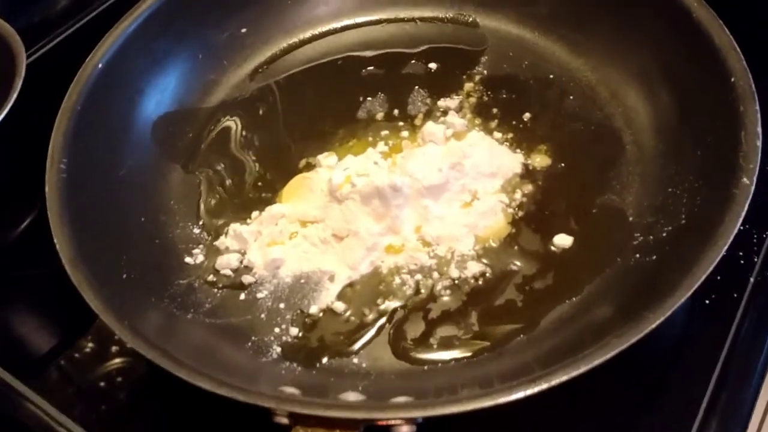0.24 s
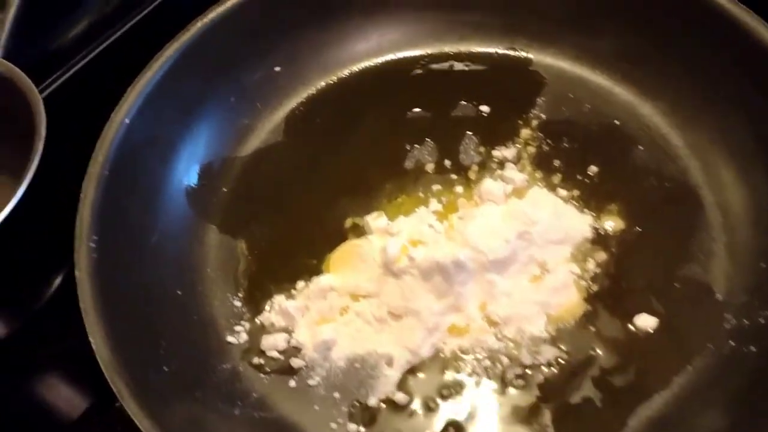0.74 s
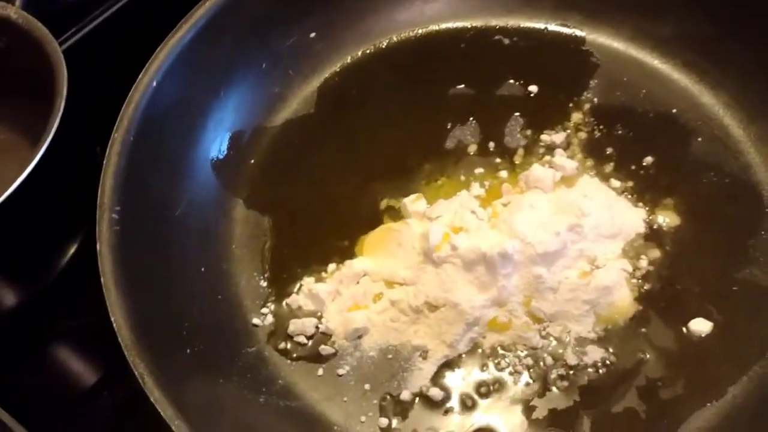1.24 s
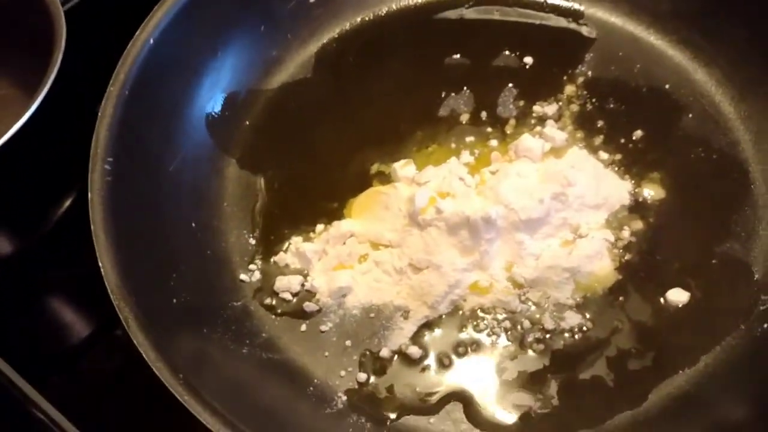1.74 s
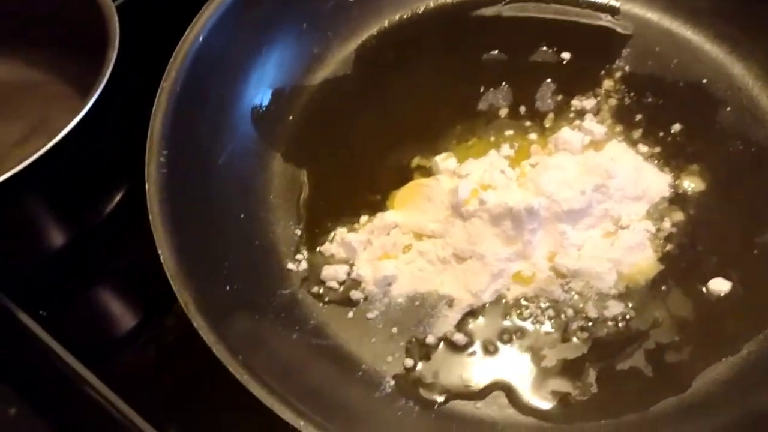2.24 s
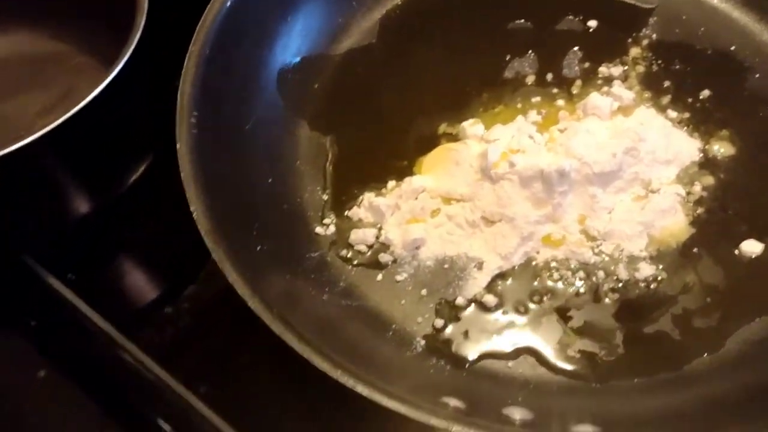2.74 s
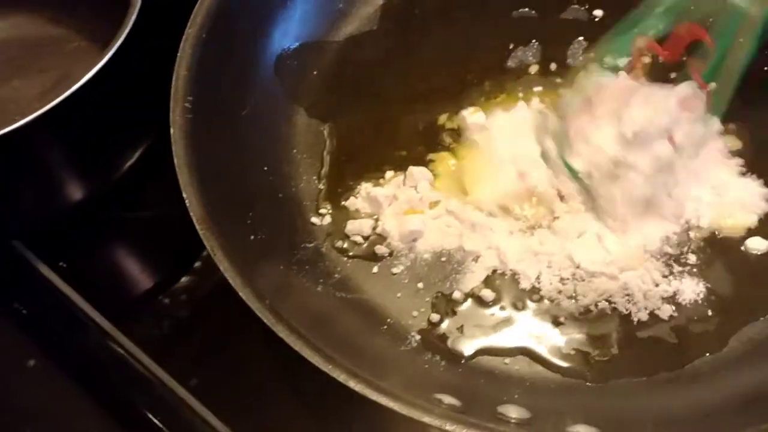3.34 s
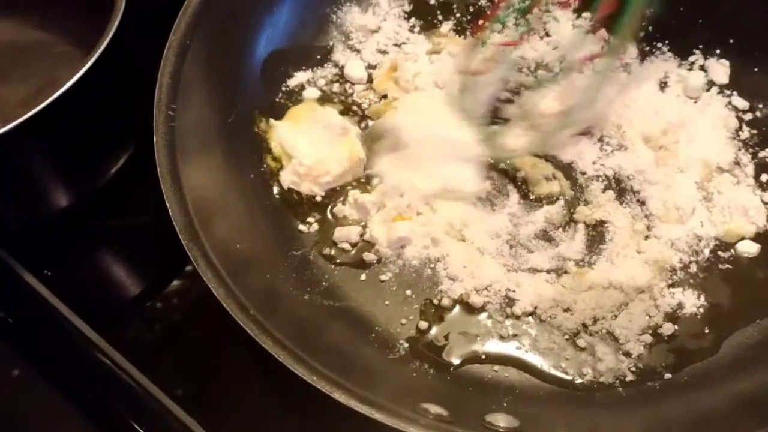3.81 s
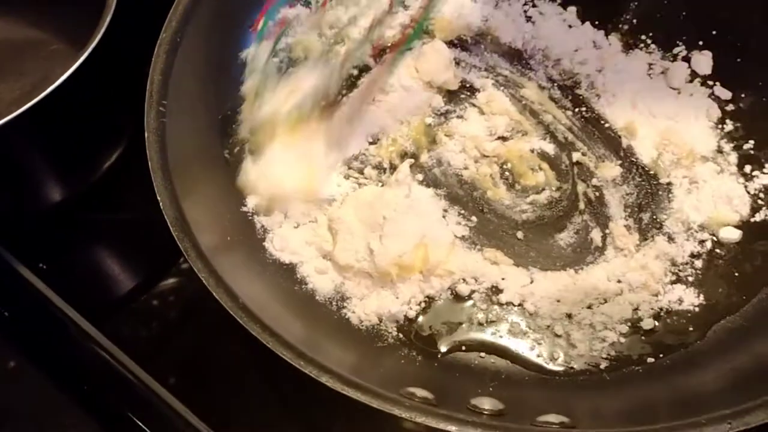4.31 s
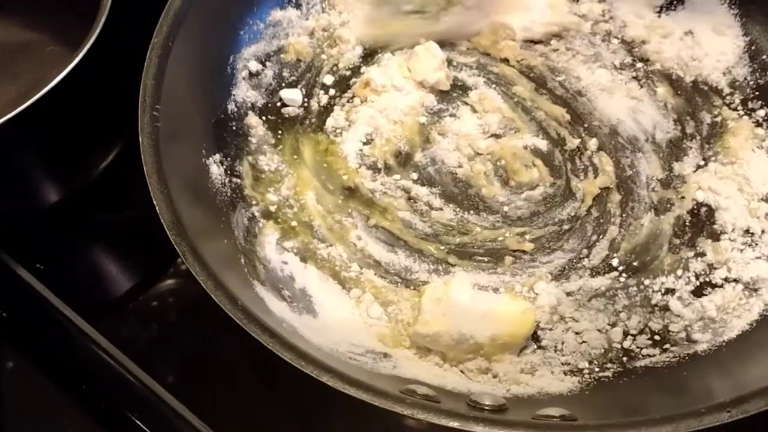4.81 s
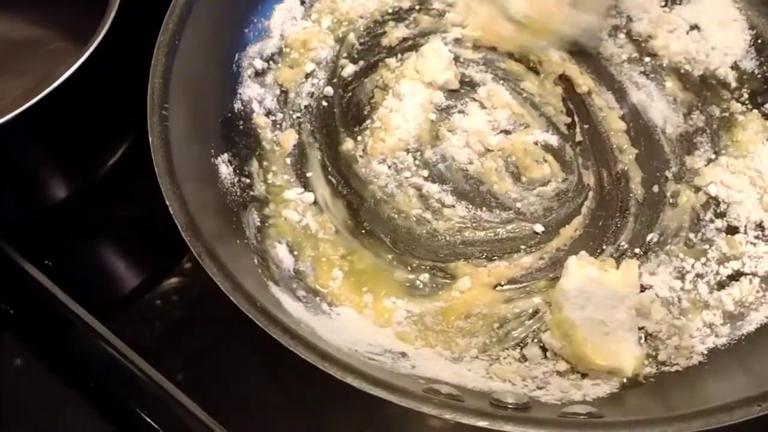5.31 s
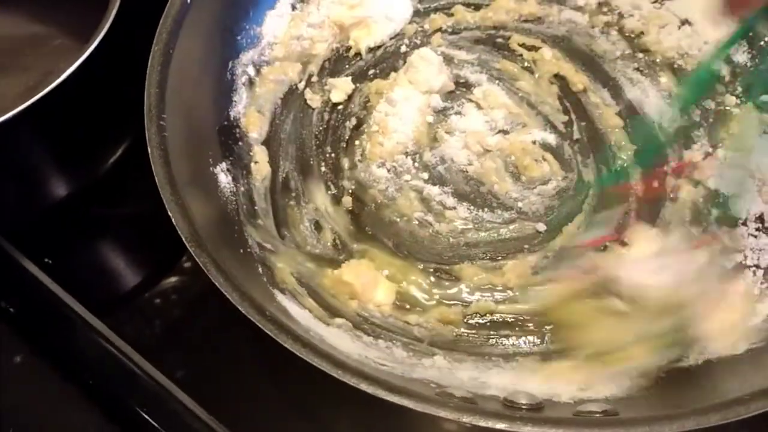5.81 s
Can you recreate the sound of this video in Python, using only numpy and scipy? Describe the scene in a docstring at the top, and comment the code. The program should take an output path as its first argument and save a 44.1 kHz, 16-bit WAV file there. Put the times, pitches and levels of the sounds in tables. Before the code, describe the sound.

Close stereo sound of a frying pan over faint mains hum and a short kitchen echo. Crackly sizzling runs throughout. First a wooden drawer slides with tiny squeaks, then a brief bright rattle of metal utensils to the right and dull bumps. Afterwards whisking rubs the pan's floor quietly while a dense, seething hiss swells, pulses and eases.

```python
"""A frying pan in a kitchen, close to a microphone with two ports, over a faint mains hum made of sines.
Butter and oil sizzle around a heap of flour throughout: flocks of damped bubble tones, crackle and fizz.
A drawer slides open with small squeaks; utensils clatter as a whisk is taken out and the drawer bumps shut:
runs of tiny impacts ring wood and metal. Then the plastic whisk drags the wet flour over the hot metal:
rubbing rings the pan's floor, and the sizzle flares up, sags a few times as the whisk circles, and settles."""
import sys
import numpy as np
from scipy import signal
from scipy.fft import rfft, irfft, next_fast_len
from scipy.io import wavfile
from scipy.ndimage import uniform_filter1d, map_coordinates

SR = 44100
rng = np.random.default_rng(int(sys.argv[2]) if len(sys.argv) > 2 else 0)


def log_audio(samples):
    """Write samples as a 16-bit WAV file to the path given in sys.argv[1]."""
    # one column per channel
    frames = np.atleast_2d(samples).T
    # limit to full scale, then quantise
    limited = np.clip(frames, -1, 1)
    pcm = np.round(limited * 32767).astype(np.int16)
    wavfile.write(sys.argv[1], SR, pcm)


N = 267246  # samples


def seconds():
    """Time of every sample."""
    return np.arange(N) / SR


def amp(db):
    """Decibels to gain."""
    return 10 ** (np.asarray(db) / 20)


def unit(x):
    """Scale to rms 1."""
    return x / np.sqrt(np.mean(x ** 2) + 1e-20)


def along(points, hz):
    """Read (pitch_hz, value) points on a log frequency axis."""
    f, v = np.transpose(points)
    return np.interp(np.log(hz + 1), np.log(f + 1), v)


def gains(rows):
    """One gain per sample for each dB column; silent until 0.1 s before the first row."""
    s, *columns = np.transpose(rows)
    t = seconds()
    entry = np.clip(1 + 10 * (t - s[0]), 0, 1)
    return [amp(np.interp(t, s, db)) * entry for db in columns]


def wobble(rate):
    """A smooth random curve through `rate` knots a second."""
    knots = rng.standard_normal(int(N * rate / SR) + 4)
    return map_coordinates(knots, [np.arange(N) * rate / SR])


def filtered(x, response):
    """Multiply the spectrum of x by a response of frequency."""
    m = next_fast_len(N + SR // 2)
    return irfft(rfft(x, m) * response(np.fft.rfftfreq(m, 1 / SR)), m)[..., :N]


def coloured(x, spectrum):
    """Shape x by a spectrum, at rms 1."""
    return unit(filtered(x, lambda hz: amp(along(spectrum, hz))))


def ring(x, modes):
    """Pass x through the resonances of a body, with alternating signs, keeping its energy."""
    def body(f):
        total = 0
        for k, (centre, width, db) in enumerate(modes):
            damping = 1j * f * width
            total = total + (-1) ** k * amp(db) * damping / (centre ** 2 - f ** 2 + damping)
        return total
    return unit(filtered(x, body)) * np.std(x)


def crackle(rate, spread_db):
    """Tiny random impulses of uneven size, `rate` a second, reaching each port differently; rms 1."""
    hit = rng.random(N) < rate / SR
    size = amp(spread_db * np.minimum(rng.exponential(size=N), 4))
    return unit(hit * size * rng.standard_normal((2, N)))


def steadied(x, span):
    """Even out swells slower than span seconds, leaving the grain."""
    width = int(span * SR)
    power = uniform_filter1d(uniform_filter1d(np.mean(x ** 2, 0), width), width)
    return x / np.sqrt(np.abs(power) + 1e-6)


def jostle(rows, rate, release):
    """Each contact (start, dB, length) is a run of tiny impacts that stops quickly."""
    t = seconds()
    force = 0
    for start, db, length in rows:
        fade = np.exp(-np.clip((t - start - length) / release, 0, 20))
        force = force + amp(db) * (t >= start) * fade
    return force * steadied(crackle(rate, spread_db=0.5), span=0.002)


def ages(starts):
    """Seconds since each start, zero before it."""
    return [np.maximum(seconds() - start, 0) for start in starts]


# faint mains hum, before its wavering gain: pitch_hz, level_db
MAINS_HUM = [(119.8, -63.5), (299.4, -76)]
# low air of the kitchen: pitch_hz, relative_db per Hz
KITCHEN_AIR = [(20, -33), (42, -26), (52, -1.5), (90, 2), (160, -5.5), (220, 4.5), (290, 5.5), (350, -8.5),
               (800, -3), (1600, -13), (4000, -15), (16000, -33)]


def background():
    """A slightly wavering mains hum of steady sines over the shaped noise of the kitchen air."""
    t = seconds()
    hum = sum(amp(db) * np.sqrt(2) * np.sin(2 * np.pi * hz * t) for hz, db in MAINS_HUM)
    waver = amp(-2.3 + 1.1 * wobble(11))
    air = amp(-66) * coloured(rng.standard_normal((2, N)), KITCHEN_AIR)
    return hum * waver + air


# squeaks of the drawer runners, before their uneven grip: start_s, length_s, pitch_hz, level_db
RUNNER_SQUEAKS = [(0.028, 0.047, 850, -44.5), (0.47, 0.073, 1087, -49), (0.529, 0.051, 1085, -51.5)]


def squeaks():
    """The runners stick and slip in short, hoarse squeaks: tones of unsteady pitch and grip."""
    t = seconds()
    waver = np.cumsum(.04 * wobble(500)) / SR  # bends the pitch by some 4 percent
    grip = amp(3 * wobble(160) - 1.5)
    tones = 0
    for start, length, hz, db in RUNNER_SQUEAKS:
        swell = np.sqrt(np.abs(np.sin(np.pi * np.clip((t - start) / length, 0, 1))))
        tones = tones + amp(db) * swell * np.sin(2 * np.pi * hz * (t + waver))
    return grip * tones


# knocks of the drawer: start_s, level_db, length_s, hardness_db, weight_db
# hardness and weight set the panel's and the cabinet's share relative to the level
DRAWER_KNOCKS = [(0.008, -44, 0.0089, -3, -16), (0.036, -46.5, 0.008, 2.5, -14),
                 (0.068, -57, 0.0081, 3, -13), (0.426, -48, .025, -1.5, -17), (0.782, -56, .025, -11, -12),
                 (1.802, -51.5, 0.05, -9, 5.5), (1.879, -50.5, .066, -5, -9),
                 (2.068, -49.5, 0.034, 3.5, 3.5), (2.635, -63.5, 0.019, 3, -2)]
# the drawer's frame: pitch_hz, width_hz, relative_db
FRAME_MODES = [(221, 32, -0.5), (294, 31, -1), (346, 38, 0)]
# the drawer's thin bottom: pitch_hz, width_hz, relative_db
BOTTOM_MODES = [(460, 130, -2.5), (705, 77, -6), (803, 59, -2), (1150, 45, -4.5), (1440, 180, -9.5)]
# the cupboard around the drawer: pitch_hz, width_hz, relative_db
CABINET_MODES = [(90, 32, -6), (165, 50, 2)]
# sliding on the runners: start_s, level_db
RUNNER_SLIDE = [(0, -45.5), (.12, -49), (.29, -51), (.36, -45), (.45, -46.5), (.56, -51), (.61, -57),
                (.8, -67)]
# colour of the sliding: pitch_hz, relative_db per Hz
SLIDE_COLOUR = [(100, -32), (250, -2), (500, -14), (1200, -8.5), (1520, -1.5), (2100, -3), (3500, 2.5),
                (8000, -54)]


def drawer():
    """The drawer rasps on its runners; hard knocks ring its thin bottom, heavy ones the cupboard."""
    s, db, length, hard, heavy = np.transpose(DRAWER_KNOCKS)

    def knock(extra_db):
        return jostle(zip(s, db + extra_db, length), rate=1300, release=0.0054)

    rasp = gains(RUNNER_SLIDE)[0] * coloured(crackle(rate=1600, spread_db=1.5), SLIDE_COLOUR)
    frame = ring(knock(0), FRAME_MODES)
    bottom = ring(knock(hard), BOTTOM_MODES)
    cabinet = ring(knock(heavy), CABINET_MODES)
    return frame + bottom + cabinet + rasp


# the utensils bump their tray: start_s, level_db
TRAY_BUMPS = [(1.729, -47), (1.806, -44), (1.872, -48), (1.918, -42.5)]
# the tray's ring: pitch_hz, relative_db, t60_s
TRAY_MODES = [(319, 0, .27), (389, -4, .17)]


def tray():
    """Each bump sets the utensil tray droning for a moment in decaying sines."""
    drone = 0
    for age, (_, db) in zip(ages([row[0] for row in TRAY_BUMPS]), TRAY_BUMPS):
        for hz, mode_db, t60 in TRAY_MODES:
            drone = drone + amp(db + mode_db - 60 * age / t60) * np.sin(2 * np.pi * hz * age)
    return drone


# utensils striking and jostling: start_s, level_db, length_s, brightness_db_per_octave, ring_db
UTENSIL_CONTACTS = [(1.729, -31, 0.0075, -5, 5.5), (1.736, -23, 0.0024, -5, -7.5), (1.741, -27, .008, 4, 4),
                    (1.755, -32, 0.0051, 3, 6), (1.775, -37.5, 0.034, -2, -3.5),
                    (1.813, -36, 0.021, 6, -0.5), (1.836, -30, 0.0055, 4, 0), (1.843, -36, 0.041, 0, -2),
                    (1.886, -34, 0.0078, -6, 5.5), (1.896, -31.5, 0.0033, -4.5, 2),
                    (1.907, -33, 0.0062, -4, 3), (1.92, -41, 0.038, 24, -4), (2.084, -40.5, 0.038, -3, 0)]
# their average ring, shifted a little at each contact: pitch_hz, width_hz, relative_db
UTENSIL_MODES = [(1516, 26, -10), (1790, 60, -14), (2505, 36, -9.5), (2780, 90, -8), (3270, 44, -5),
                 (3420, 34, 0), (3550, 60, -7), (3915, 60, -10), (4230, 130, -4), (5050, 70, -8),
                 (5230, 46, 1), (5540, 60, -9), (6330, 90, -7.5), (7490, 66, -17)]
# dry part of the clatter: pitch_hz, relative_db per Hz
RATTLE_COLOUR = [(300, -26), (1200, -7.5), (2600, -0.5), (5500, 0), (8000, -15), (11000, -20), (15000, -18)]


def utensils():
    """Utensils strike and chatter; each contact rings their metal modes in other shares."""
    rung, chatter = 0, 0
    for start, db, length, bright, ring_db in UTENSIL_CONTACTS:
        impacts = jostle([(start, db, length)], rate=4000, release=0.005)
        modes = []
        for hz, width, level in UTENSIL_MODES:
            # each contact rings at slightly shifted pitches
            shifted = hz * (1 + .002 * rng.standard_normal())
            share = level + bright * np.log2(hz) + 2.5 * rng.standard_normal()
            modes.append((shifted, width, share))
        rung = rung + amp(ring_db) * ring(impacts, modes)
        chatter = chatter + impacts
    rattle = coloured(chatter, RATTLE_COLOUR) * np.std(chatter)
    return rung + amp(-2.0) * rattle


# rubbing of the whisk, before its uneven pressure: start_s, relative_db
WHISK_RUB = [(3.3, -104), (3.7, -64), (4.25, -59.5), (4.65, -55.5), (5.1, -58.5), (5.5, -74)]
# ring of the pan's floor, before it is bent: pitch_hz, width_hz, relative_db
PAN_MODES = [(165, 50, 0), (218, 30, 2), (292, 36, 3), (400, 40, -4), (469, 26, -3), (660, 28, -12),
             (860, 63, -13)]
# the pan shifting on the hob: start_s, level_db, length_s
PAN_BUMPS = [(3.14, -68, 0.055), (3.885, -57.5, 0.035)]
# ring of the hob: pitch_hz, width_hz, relative_db
HOB_MODES = [(72, 20, -8), (100, 39, 3)]
PRESS_DB, PRESSES_PER_S = 2, 13  # unevenness of the pressure
DETUNE = .022  # typical bend of the ring, as a fraction of its pitch


def whisk():
    """Plastic loops rub and tick over the pan's floor, its ring wavering, and nudge the pan on the hob."""
    pressure = amp(PRESS_DB * wobble(PRESSES_PER_S))
    rubbing = ring(gains(WHISK_RUB)[0] * pressure * crackle(rate=1100, spread_db=2.0), PAN_MODES)
    # reading the sound at an uneven speed bends its pitch
    bent = np.arange(N) + np.cumsum(DETUNE * wobble(PRESSES_PER_S))
    rubbing = np.array([np.interp(bent, np.arange(N), port) for port in rubbing])
    bumps = ring(jostle(PAN_BUMPS, rate=910, release=0.017), HOB_MODES)
    return amp(-5.5) * rubbing + bumps


def bubbles(at, hz, height, cycles, count=128):
    """Each bubble is a short damped tone of count samples, with its own phase at each port."""
    k = np.arange(count)
    turns = hz[:, None] * k / SR
    fade = height[:, None] * np.exp(-turns / cycles) * (1 - np.exp(-2 * turns))
    where = ((at * SR).astype(int)[:, None] + k).ravel()
    phase = rng.random((2, len(at), 1))
    tones = [(fade * np.sin(2 * np.pi * (turns + p))).ravel() for p in phase]
    return np.array([np.bincount(where, tone, N)[:N] for tone in tones])


def bursts(start, height, hz, fade, scatter, cycles, count):
    """A water pocket lets go a flock of like-sized bubbles that swells quickly and thins out."""
    wait = -np.log(1 - (np.arange(count) + rng.random((len(start), count))) / (count + 1))
    pitch, loud = rng.standard_normal((2, len(start), count))
    at = start[:, None] + fade[:, None] * wait
    pitches = hz[:, None] * np.exp(scatter * pitch)
    sizes = height[:, None] * amp(2 * loud - 2.95 * wait) * (1 - np.exp(-6 * wait))
    return bubbles(at.ravel(), pitches.ravel(), sizes.ravel(), cycles)


def boiling(spectrum, centre_hz, range_octaves, spread_db, hiss_db, count):
    """Many overlapping bursts, each at a pitch of its own, over a bed of crackle; steadied."""
    when, length = rng.random((2, count))
    pitch, loud = np.clip(rng.standard_normal((2, count)), -2, 2)
    hz = centre_hz * 2 ** (range_octaves * pitch)
    fade = .007 + .014 * length
    flocks = bursts(when * N / SR, amp(spread_db * loud), hz, fade, scatter=0.067, cycles=4.6, count=30)
    # the pitches already shape the flocks, so the spectrum acts on them more weakly
    flocks = unit(filtered(flocks, lambda f: amp(0.6 * along(spectrum, f))))
    hiss = coloured(crackle(rate=9000, spread_db=1.5), spectrum)
    return steadied(flocks + amp(hiss_db) * hiss, span=0.038)


def flares(rate, power_fade, spread_db):
    """A gain of rms 1 that jumps up at random moments, its power dying away over power_fade seconds."""
    size = amp(spread_db * np.clip(rng.standard_normal(N), -2.5, 2.5))
    kicks = (rng.random(N) < rate / SR) * size
    power = signal.lfilter([1], [1, -np.exp(-1 / (power_fade * SR))], kicks ** 2)
    return unit(np.sqrt(power))


FIRST_LULL_S, TURN_S, LULL_S, LULL_DB = 4.37, 0.469, 0.027, 10.5


def lulls(count=3):
    """Dips in dB, a turn apart: the whisk leaves the hot middle and the sizzle sags."""
    t = seconds()
    centres = [FIRST_LULL_S + turn * TURN_S for turn in range(count)]
    return -LULL_DB * sum(np.exp(-.5 * ((t - centre) / LULL_S) ** 2) for centre in centres)


# damp flour touching the fat, before a common lift: start_s, relative_db
FLOUR_PUFFS = [(.713, -49.5), (.992, -54), (1.432, -52.5), (2.014, -50), (2.443, -47), (2.673, -53),
               (2.853, -52), (3.028, -60), (4.012, -46), (4.491, -42), (5.249, -55), (5.399, -43)]
PUFF_RISE_S, PUFF_FADE_S = 0.0039, 0.012


def puffs():
    """Gain of the fizz as damp flour touches the fat: each puff swells at once and dies away."""
    total = 0
    for age, (_, db) in zip(ages([row[0] for row in FLOUR_PUFFS]), FLOUR_PUFFS):
        swell = (1 - np.exp(-age / PUFF_RISE_S)) * np.exp(-age / PUFF_FADE_S)
        total = total + amp(db + 9.0) * swell
    return total


# heat of the frying, before the final mix: start_s, sputter_db, fine_fizz_db
FRYING_HEAT = [(0, -38, -57.5), (.33, -38.5, -51.5), (.56, -42, -66), (.76, -42.5, -56), (1.08, -44, -65.5),
               (1.24, -52.5, -64.5), (1.42, -48.5, -71), (1.66, -54, -61.5), (2.05, -51.5, -57.5),
               (2.13, -41.5, -51.5), (2.47, -47, -58.5), (2.64, -45, -64.5), (2.98, -55, -53.5),
               (3.29, -50, -56), (3.36, -40, -49), (3.65, -32, -40), (4.06, -32.5, -40.5),
               (4.35, -38.5, -46), (4.75, -37.5, -55), (5.22, -40, -57), (5.33, -45, -54.5),
               (5.7, -42.5, -44), (6.06, -40.5, -48.5)]
# wet flour seething on bare metal in larger, lower bubbles, before the mix: start_s, relative_db
SEETHE_LEVEL = [(3.42, -55), (3.68, -37.5), (4.05, -36), (4.45, -42.5), (5.25, -44), (5.36, -57),
                (5.62, -61), (6.06, -57)]
# pockets of water bursting in the fat, before the mix: start_s, relative_db, pitch_hz, fade_s
WATER_SPITS = [(0.121, -19, 4640, .019), (.192, -26, 5840, 0.014), (.218, -41, 5230, 0.015),
               (.236, -21, 4300, 0.013), (.394, -20, 5130, 0.011), (0.462, -26, 5550, .012),
               (.561, -21, 5640, 0.0036), (.609, -20.5, 5700, 0.02), (.697, -21, 5260, 0.02),
               (0.738, -25, 5360, 0.015), (.823, -40, 5230, 0.0095), (0.903, -31.5, 2960, .014),
               (.942, -20, 3640, 0.017), (1.071, -27, 4900, .012), (1.182, -28.5, 3630, 0.0084),
               (1.306, -30.5, 4400, .006), (1.429, -28, 5270, 0.017), (1.526, -38, 4900, 0.015),
               (2.01, -35.5, 3960, .012), (2.087, -20.5, 5200, .018), (2.24, -30.5, 2770, .012),
               (2.24, -29, 4470, .011), (2.334, -29, 5000, .012), (2.345, -42, 2740, .012),
               (2.386, -36, 2770, 0.021), (2.425, -20.5, 5500, .014), (2.485, -36.5, 2820, 0.021),
               (2.503, -30, 4050, 0.0097), (2.553, -39, 2700, 0.013), (2.581, -29.5, 4470, 0.0099),
               (2.746, -28.5, 6100, 0.014), (2.824, -24.5, 4300, 0.02), (2.903, -31, 3850, 0.013),
               (2.969, -36.5, 4320, 0.0088), (3.014, -35.5, 3840, 0.014), (3.057, -30, 4860, .012),
               (3.089, -26.5, 5800, 0.018), (3.149, -27, 6000, 0.016), (3.194, -35, 7150, .01),
               (3.253, -27, 7700, .011), (3.317, -24, 5060, 0.0075), (3.427, -22, 4900, 0.014),
               (3.552, -19, 5500, .014), (3.602, -25, 3600, 0.013), (3.61, -17, 6800, .011),
               (3.645, -15.5, 4180, 0.017), (3.693, -17.5, 4260, .013), (3.766, -12, 4950, .016),
               (3.872, -17.5, 3400, 0.007), (3.924, -21.5, 3000, .008), (4.002, -22, 2700, 0.014),
               (4.02, -15.5, 5650, 0.016), (4.066, -25, 5170, 0.01), (4.114, -16.5, 4200, 0.01),
               (4.165, -16, 5000, 0.0076), (4.189, -25.5, 2740, .01), (4.236, -17, 5960, 0.012),
               (4.279, -15, 4380, 0.01), (4.302, -18.5, 6200, .009), (4.419, -23, 5370, .011),
               (4.463, -27, 7200, 0.011), (4.479, -22, 4450, 0.009), (4.522, -22.5, 3620, .012),
               (4.573, -22, 4500, 0.0084), (4.696, -18.5, 3560, .013), (4.756, -22, 6900, 0.0056),
               (4.845, -25.5, 4650, 0.0094), (4.849, -32.5, 3080, 0.0094), (4.884, -26.5, 3900, 0.0096),
               (4.911, -20.5, 5700, 0.0099), (4.982, -20.5, 4600, .012), (4.997, -21, 6540, .011),
               (5.007, -25.5, 3390, .011), (5.056, -28.5, 3800, 0.014), (5.162, -27.5, 3320, 0.0089),
               (5.21, -24, 6200, 0.0073), (5.221, -29, 3000, 0.012), (5.305, -28.5, 4000, 0.0091),
               (5.349, -30, 6300, 0.012), (5.4, -25, 6860, 0.011), (5.419, -38, 2130, .012),
               (5.47, -21.5, 5740, 0.013), (5.585, -21, 6400, 0.011), (5.608, -19, 6260, .011),
               (5.747, -24, 5450, .011), (5.785, -25, 5460, .011), (5.829, -22, 5200, 0.012),
               (5.9, -17, 4650, .02), (5.944, -16, 4950, 0.0044), (6.003, -28, 4260, 0.0048),
               (6.029, -32.5, 2580, 0.013), (6.035, -17, 5170, 0.011)]
# colour of the sputter: pitch_hz, relative_db per Hz
SPUTTER_COLOUR = [(600, -22.5), (1200, -20), (1750, -16), (2250, -12), (2750, -4), (3300, -11.5),
                  (3900, -2.5), (4700, 2.5), (5450, 6), (6100, -1), (6700, -12), (8000, -11), (13000, -34)]
# colour of the spray of small bubbles: pitch_hz, relative_db per Hz
SPRAY_COLOUR = [(4000, -36), (6000, -0.5), (6900, -2.5), (7200, -5.5), (8000, -8.5), (8700, -23.5),
                (10000, -13.5), (13000, -15)]
# colour of the seething: pitch_hz, relative_db per Hz
SEETHE_COLOUR = [(300, -39), (750, -32), (1250, -10), (1600, -12), (2000, -5), (2300, -2), (2700, -3),
                 (3200, 3), (3900, 2.5), (5000, -2), (8000, -13)]
# colour of the finest fizz: pitch_hz, relative_db per Hz
FIZZ_COLOUR = [(5000, -24), (8000, -1), (9000, 2.5), (10300, 0), (12500, 5.5), (15300, 8), (16000, 1.5)]
# resonances of the pan's bowl: pitch_hz, width_hz, level_db against the direct sound
BOWL_MODES = [(2830, 400, -9), (3144, 30, -8), (3795, 80, -7), (4755, 40, -7), (5560, 110, -8)]
SURGE_DB, SURGES_PER_S = 1.76, 17  # the boiling surges at random
# as the paste spreads thin, the spray of small bubbles gains on the rest
SPRAY_DB, THINNED_DB, THIN_FROM_S, THIN_S = -3.5, 6.5, 2.84, 1.88


def frying():
    """Bubbles sputter, spray, spit and seethe in the fat; fine crackle fizzes; the bowl colours the larger ones."""
    boil, fine = gains(FRYING_HEAT)
    stirred = amp(lulls())

    def surge():
        return amp(SURGE_DB * wobble(SURGES_PER_S))

    sputter = boil * stirred * surge() * boiling(
        SPUTTER_COLOUR, centre_hz=4864, range_octaves=0.28, spread_db=3.5, hiss_db=-4.5, count=720)

    thinned = np.clip((seconds() - THIN_FROM_S) / THIN_S, 0, 1)
    small = np.sqrt(boil * fine) * amp(SPRAY_DB + THINNED_DB * thinned)  # between sputter and fizz
    spray = small * surge() * boiling(
        SPRAY_COLOUR, centre_hz=7390, range_octaves=0.21, spread_db=4.5, hiss_db=-5.5, count=280)

    seethe = gains(SEETHE_LEVEL)[0] * stirred * boiling(
        SEETHE_COLOUR, centre_hz=2910, range_octaves=0.25, spread_db=-1.0, hiss_db=4.0, count=360)

    grain = coloured(crackle(rate=7600, spread_db=5.5), FIZZ_COLOUR)
    grain = steadied(grain * flares(rate=240, power_fade=0.0073, spread_db=3.5), span=0.098)
    fizz = np.hypot(fine * surge(), puffs()) * grain

    s, db, hz, fade = np.transpose(WATER_SPITS)
    spits = bursts(s, amp(db - 6.5), hz, fade, scatter=0.098, cycles=3.52, count=56)
    # bubbles this small radiate no bass
    spits = filtered(spits, lambda f: 1 / np.sqrt(1 + (1950 / (f + 1)) ** 8))

    def bowl(f):
        return 1 + sum(amp(level) / (1 + 2j * (f - centre) / width) for centre, width, level in BOWL_MODES)

    bubbling = amp(0.77) * sputter + spits + amp(-2.0) * seethe
    return amp(-0.22) * filtered(bubbling, bowl) + spray + amp(1.5) * fizz


# echo of the kitchen: pitch_hz, t60_s
WALL_ECHO = [(150, 0.58), (600, 0.48), (2000, 0.23), (6000, 0.095), (15000, 0.2)]


def room(x):
    """The kitchen's short echo: noise whose decay time depends on frequency, longest in the bass."""
    hz, t, z = signal.stft(rng.standard_normal((2, SR // 2)), SR, nperseg=256)
    decay = amp(-60 * t / along(WALL_ECHO, hz)[:, None])
    tail = signal.istft(z * decay, SR, nperseg=256)[1]
    return signal.fftconvolve(x, tail / np.linalg.norm(tail[0]), axes=1)[:, :N]


# likeness of the two microphone ports: pitch_hz, correlation (1 = identical)
PORT_LIKENESS = [(100, .96), (300, .82), (600, .45), (1000, .15), (2500, .05), (5500, -.08), (6750, 0),
                 (7050, .9), (9000, .8), (11000, .84), (15000, .83)]
# balance of the two ports: pitch_hz, left_minus_right_db
PORT_BALANCE = [(100, -1), (400, -1), (1500, -1.5), (3300, -3.5), (4400, -0.5), (5600, -6.5), (6300, -3.5),
                (7000, 0.7), (9500, 0.5), (11500, -1), (13000, -3.5), (15000, -6.5)]


def ports(x):
    """Bass and top treble reach both ports much alike; the middle is wide and leans right."""
    def mid_side(hz):
        turn = np.arccos(np.clip(along(PORT_LIKENESS, hz), -1, 1)) / 2
        return np.array([np.cos(turn), np.sin(turn)])

    mid, side = filtered(x, mid_side)
    pair = np.array([mid + side, mid - side])
    return filtered(pair, lambda hz: amp(np.outer([.5, -.5], along(PORT_BALANCE, hz))))


def panned(x, left_minus_right_db):
    """Set the level difference between the ports."""
    return x * amp(left_minus_right_db * np.array([[.5], [-.5]]))


def scene():
    """Pan and drawer share the kitchen's echo; utensils, tray and squeaks lie to the right."""
    near = frying() + whisk()
    wood = drawer()
    metal = utensils()
    tones = squeaks() + tray()
    echo = room(amp(-6.0) * near + amp(-6.5) * wood + amp(-8) * tones)
    clatter = ports(metal + amp(-5.0) * room(metal))
    return ports(near + wood + echo + background()) + panned(tones, -5) + panned(clatter, -1.5)


TOP_HZ = 15790  # band limit


def record(dry):
    """Nothing is kept above the band limit."""
    return filtered(dry, lambda hz: hz < TOP_HZ)


dry = scene()
out = record(dry)
log_audio(out)
```